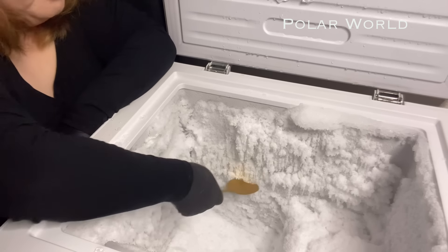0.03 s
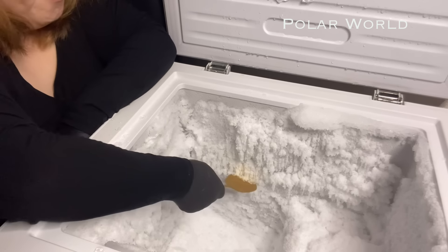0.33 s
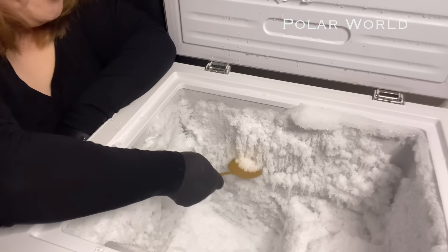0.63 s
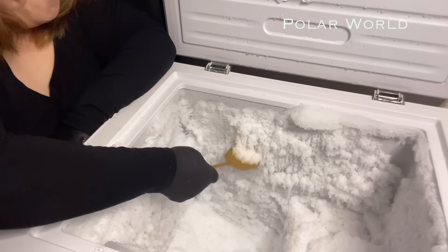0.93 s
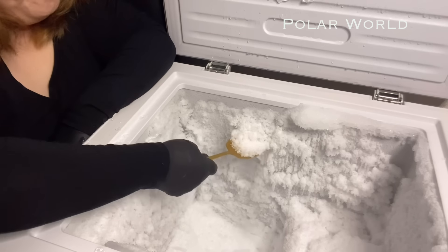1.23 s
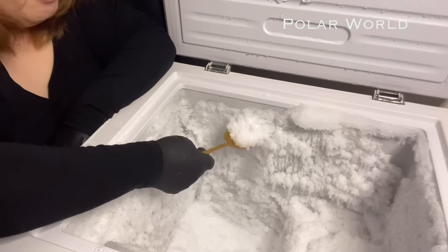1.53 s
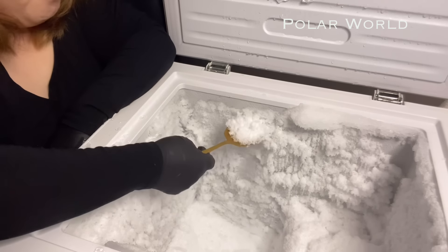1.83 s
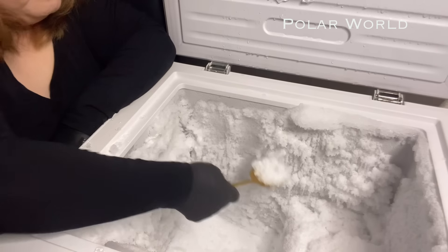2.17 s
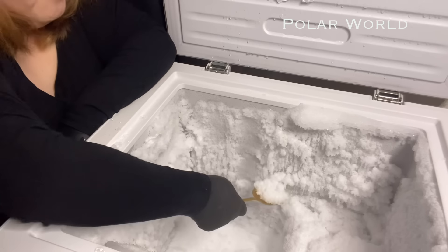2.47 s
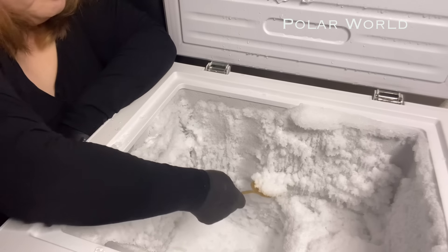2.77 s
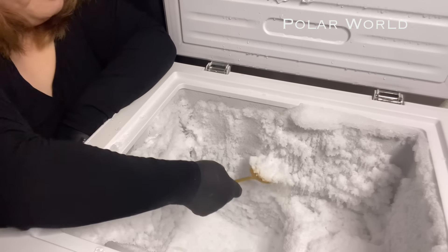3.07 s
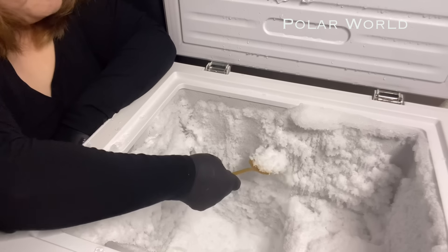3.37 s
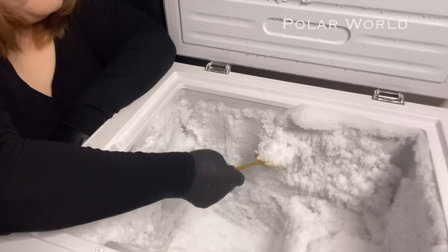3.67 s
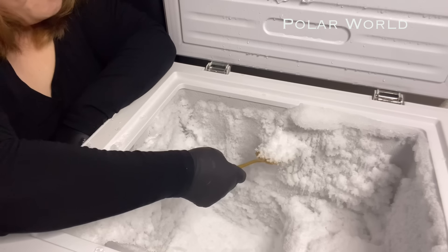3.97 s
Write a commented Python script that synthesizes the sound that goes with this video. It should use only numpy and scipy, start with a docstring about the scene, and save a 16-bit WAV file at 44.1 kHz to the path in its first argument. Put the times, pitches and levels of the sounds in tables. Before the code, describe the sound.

A metal spoon scrapes thick frost inside a chest freezer, with crunches, small snaps and hollow knocks. The strokes ease midway as a few crumbs drop, then resume more softly, heard close in a quiet room.

```python
"""In a quiet room, a metal spoon scrapes thick frost off the wall of a chest freezer.
From the first stroke, stick-slip friction breaks ice crystals in clumps and shakes the hollow wall.
The bare spoon rings, larger crusts snap, and the edge catches and knocks the wall's modes into motion.
As snow fills the bowl, damping muffles the spoon. Midway the strokes ease and crumbs drop into the
chest; then the scraping resumes, softened by loose powder."""
import sys
import numpy as np
from scipy import signal
from scipy.fft import rfft, irfft
from scipy.io import wavfile
from scipy.ndimage import uniform_filter1d

SR = 44100
rng = np.random.default_rng(int(sys.argv[2]) if len(sys.argv) > 2 else 0)


def master(y):
    """Save y as 16-bit WAV."""
    cut = np.clip(np.atleast_2d(y).T, -1, 1)
    pcm = np.round(cut * 32767)  # scale
    wavfile.write(sys.argv[1], SR, pcm.astype(np.int16))


N = 176400
T = np.arange(N) / SR


def amp(db):
    return 10 ** (np.asarray(db) / 20)


def unit(x):
    return x / np.sqrt(np.mean(x ** 2) + 1e-20)


def read(points, hz):
    f, value = np.transpose(points)
    return np.interp(np.log(hz + 1), np.log(f), value)


def level(points, column=1):
    """Amplitude envelope from rows of time and dB."""
    rows = np.array(points)
    return amp(np.interp(T, rows[:, 0], rows[:, column]))


def add(mix, s, sound):
    part = mix[max(round(s * SR), 0):][:len(sound)]
    part += sound[:len(part)]


def convolve(x, response):
    return signal.fftconvolve(x, response / np.linalg.norm(response))[:len(x)]


def colour(x, spectrum, size=8192):
    """Minimum-phase filtering gives x a spectral shape."""
    log_gain = np.log(amp(read(spectrum, abs(np.fft.fftfreq(size, 1 / SR)))))
    response = np.fft.ifft(np.exp(np.conj(signal.hilbert(log_gain))))
    return convolve(x, response.real[:size // 2])


def wander(hz):
    """Low-pass noise: a smooth random fluctuation up to the given rate."""
    rolloff = 1 + (np.fft.rfftfreq(N, 1 / SR) / hz) ** 4
    return unit(irfft(rfft(rng.standard_normal(N)) / rolloff, N))


def ping(hz, cycles):
    """Damped oscillation whose envelope peaks at 1 after the given cycles."""
    u = T[:4000] * hz / cycles
    return u * np.exp(1 - u) * np.sin(2 * np.pi * hz * T[:4000])


def resonate(x, hz, width_hz):
    """Forced resonance whose centre follows the curve hz."""
    turn = np.exp(2j * np.pi * np.cumsum(hz) / SR)
    r = np.exp(-np.pi * width_hz / SR)
    return unit((turn * signal.lfilter([1], [1, -2 * r, r * r], x / turn)).real)


def snow_load(full_s=2.8):
    """Share of the bowl that is packed with snow."""
    return np.minimum(T / full_s, 1)


def fractures(per_s, spread_db, clumps):
    """Brittle fracture as a Poisson process: uneven clicks in clumps, at steady mean power."""
    clicks = (rng.random(N) < per_s / SR) * rng.choice([-1., 1.], N)
    sizes = amp(spread_db * np.minimum(rng.exponential(1, N), 4))
    x = clicks * sizes * clumps
    return x / np.sqrt(abs(uniform_filter1d(x ** 2, 2600)) + 1e-9)


# Spectrum of the room tone. Each row: frequency in Hz, relative density in dB.
AIR_SPECTRUM = [(25, 3), (60, -1.5), (125, 4), (200, -16), (300, -2), (450, -5), (700, -7.5), (1200, -11),
                (2500, -11.5), (7000, -22), (15000, -44)]

def room_tone(db=-62):
    """Stationary noise, strongest in the bass, lies under the scene."""
    return amp(db) * unit(colour(rng.standard_normal(N), AIR_SPECTRUM))


def crystals(per_s, spread_db, clumps, cycles, patchy_db):
    """Free vibration: each size of crystal cracks with its own short pitch."""
    out = np.zeros(N)
    for hz in np.geomspace(600, 15000, 10):
        cracks = fractures(per_s, spread_db, clumps * amp(patchy_db * wander(39)))
        out += np.sqrt(hz) * convolve(cracks, ping(hz, cycles))
    return unit(out)


# One list per stroke. Each row: time in seconds, then crunch, fizz and wall rumble levels in dB.
STROKE_LEVELS = [
    [(0.0, -49, -57, -47), (0.028, -45, -46, -60), (0.042, -36, -33, -64), (0.047, -43, -54, -31.5),
     (0.066, -43.5, -46, -38), (0.16, -57, -62, -45.5)],
    [(0.18, -49.5, -53, -47), (0.27, -44.5, -49, -39), (0.41, -36, -39.5, -27), (0.498, -37.5, -39, -33.5),
     (0.706, -41, -46, -31), (0.82, -43, -52, -39.5)],
    [(0.894, -34, -43.5, -30), (1.018, -30.5, -40.5, -27.5), (1.12, -43, -48, -36),
     (1.166, -36.5, -47, -31), (1.295, -47.5, -49.5, -36)],
    [(1.41, -32, -45.5, -30.5), (1.44, -38, -48, -35), (1.465, -39, -45, -36.5), (1.515, -44, -52, -46)],
    [(1.545, -38.5, -47, -35.5), (1.575, -43, -52, -43), (1.612, -40.5, -48, -35), (1.75, -62, -68, -64)],
    [(1.805, -61, -60, -66), (1.818, -53, -52, -38), (1.86, -47.5, -53, -46.5), (1.934, -71, -68, -66)],
    [(2.015, -57.5, -65, -72), (2.04, -46, -57, -39.5), (2.105, -46.5, -62, -44.5),
     (2.2, -66.5, -67.5, -67), (2.52, -74, -66, -72)],
    [(2.542, -48, -58.5, -49.5), (2.595, -36.5, -49.5, -37), (2.665, -56, -63, -47.5),
     (2.696, -37.5, -46.5, -47), (2.76, -47.5, -49, -51)],
    [(2.88, -38.5, -38, -45), (3.0, -35, -41.5, -38), (3.14, -42.5, -46, -40.5), (3.24, -38.5, -41.5, -40),
     (3.32, -41.5, -48.5, -37), (3.39, -55, -61.5, -46), (3.49, -60.5, -61, -51)],
    [(3.52, -39.5, -45, -39), (3.67, -41.5, -49, -39), (3.705, -51.5, -59, -42.5),
     (3.77, -50.5, -54, -47.5)],
    [(3.82, -45.5, -49.5, -42.5), (4.0, -62.5, -68, -69)],
]
# Spectra of coarse and fine breaking frost. Each row: frequency in Hz, relative density in dB.
CRUNCH_SPECTRUM = [(150, -66), (350, -8), (600, -1), (1080, 2), (1270, -6.5), (1560, 5), (2100, -3.5),
                   (2800, -.5), (3400, -3.5), (4200, -2), (5200, -9), (6500, -7), (10000, -48)]
FIZZ_SPECTRUM = [(2500, -27), (4500, -5.5), (5600, 2.5), (7200, -1), (8800, -1.5), (10200, -9.5),
                 (11600, -11.5), (13000, -12), (15800, -20.5)]

def frost(strokes, clumps, powder_db=5):
    """Acoustic emission: fractures crunch and fizz; loose powder softens both as the bowl fills."""
    powder_gain = amp(powder_db) * snow_load() ** 2
    powder = powder_gain * rng.standard_normal((2, N))
    crunch = fractures(1800, 1.26, clumps) + powder[0]
    crunch += amp(2) * crystals(600, 3.1, clumps, cycles=0.71, patchy_db=1.5)
    fizz = fractures(3200, 1.8, clumps ** 0.84) + powder[1]
    fizz += amp(7) * crystals(1100, 2.9, clumps ** 0.83, cycles=0.78, patchy_db=2.0)
    even = 1 / np.sqrt(1 + powder_gain ** 2 / 3)  # offsets the powder's added power
    crunch = unit(colour(crunch * even, CRUNCH_SPECTRUM)) * level(strokes, 1)
    fizz = unit(colour(fizz * even, FIZZ_SPECTRUM)) * level(strokes, 2)
    return amp(-1.5) * crunch + fizz


# Broad response of the hollow wall. Each row: frequency in Hz, relative gain in dB.
WALL_RESPONSE = [(30, -56), (55, -12.5), (80, -4.5), (98, -12.5), (128, 8), (165, -3), (200, 4.5),
                 (250, -0.5), (340, 1), (420, -4.5), (520, -7), (700, -12.5), (1100, -16), (2500, -43)]
# Panel modes. Each row: frequency in Hz, relative level in dB, 60 dB decay time in seconds.
PANEL_MODES = [(125.6, -1.5, 1), (146.3, 4, 0.54), (188.3, -8, 0.35), (270.7, 7.5, 0.59),
               (326.4, 9.5, 0.46), (351.3, 8, 0.42), (406.4, 9, 0.26), (493, 10, 0.06), (675, 3, 0.31),
               (1123, -7, 0.19)]
# The spoon knocks the wall. Each row: start in seconds, relative level in dB, pitch of the spot in Hz.
WALL_KNOCKS = [(.046, -26.5, 390), (.397, -14, 414), (0.405, -16.5, 360), (.525, -23, 131.5),
               (0.652, -19.5, 131.5), (0.658, -13.5, 309), (1.029, -26, 135), (1.167, -21, 422),
               (1.181, -25, 125), (1.385, -17, 1110), (1.394, -17.5, 370), (1.55, -18.5, 410),
               (1.557, -25.5, 133), (1.61, -30.5, 136), (1.814, -37, 363), (2.06, -29.5, 331),
               (2.095, -23.5, 320), (2.543, -35, 300), (3.212, -30, 132), (3.312, -28, 297),
               (3.434, -35.5, 325), (3.655, -30, 364), (3.818, -41, 310)]

def wall(strokes, clumps, blow_db=13, thud_db=-6):
    """Modal excitation: slips shake the wall, and each knock favours the modes near its own pitch."""
    blows, thuds = np.zeros(N), np.zeros(N)
    for s, db, hz in WALL_KNOCKS:
        blow = ping(hz, cycles=0.32)
        add(blows, s, amp(db + blow_db) * blow / abs(blow).sum())
        add(thuds, s, amp(db + thud_db) * ping(hz, cycles=1.72))
    force = amp(-4) * fractures(900, 2.1, clumps) * level(strokes, 3) + blows
    t = T[:SR // 3]
    panel = sum(amp(db - 60 * t / t60) * np.sin(2 * np.pi * hz * t) for hz, db, t60 in PANEL_MODES)
    return amp(1.5) * colour(force, WALL_RESPONSE) + amp(-7.5) * convolve(force, panel) + thuds


# Resonance of the bowl. Each row: time in seconds, gain on the crunch envelope in dB, pitch in Hz.
BOWL_RESONANCE = [(0, 3.5, 1650), (.3, -1.5, 1740), (.8, -0.5, 1630), (1.05, -13, 1790), (1.22, -2, 1660),
                  (1.6, -7, 2720), (2.95, -6.5, 2040), (4, -11, 2450)]

def spoon_bowl(strokes, clumps):
    """Fractures force the bowl's resonance, which lies higher once snow packs it."""
    times, _, pitches = np.transpose(BOWL_RESONANCE)
    tone = resonate(fractures(900, 5.6, clumps), np.interp(T, times, pitches), width_hz=440)
    return amp(-2) * tone * level(BOWL_RESONANCE) * level(strokes, 1)


# Modes of the spoon. Each row: frequency in Hz, relative level in dB, bandwidth in Hz.
SPOON_MODES = [(1626, -9.5, 84), (5580, -3, 190), (6610, 4.5, 140), (8060, -0.5, 140), (9350, 8, 240),
               (11140, 0, 110), (11590, 2, 170), (12050, -2.5, 160), (14780, -3, 250), (15300, -10, 250)]
# Ringing, which snow damps. Each row: time in seconds, gain on the fizz envelope in dB.
RING_LEVELS = [(0, -11.5), (.2, 1.5), (.34, 4.5), (.47, -6.5), (.85, 5), (1.1, -11), (4, -9)]
# The bare edge catches and one mode flares. Each row: time in seconds, boost in dB, frequency in Hz.
MODE_FLARES = [(.315, 13, 8040), (.33, 0, 9210), (.36, 6, 8040), (.395, 3, 6620), (.418, 4, 9210),
               (.9, 4, 6620)]

def spoon_ring(strokes, clumps, flare_s=0.021, sag=0.011, smear=0.0096, flicker_db=2.0):
    """Fractures ring the thin metal; mass loading by snow lowers and blurs its modes."""
    edge, ring = fractures(2300, 4.1, clumps), np.zeros(N)
    detune = 1 + snow_load() * (smear * wander(hz=130) - sag)
    for hz, db, width_hz in SPOON_MODES:
        flare_db = sum(boost * np.exp(-((T - s) / flare_s) ** 2)
                       for s, boost, near in MODE_FLARES if abs(np.log2(near / hz)) < 0.1)
        gain = amp(db + flare_db + flicker_db * wander(hz=14))
        ring += gain * resonate(edge, hz * detune, width_hz)
    return amp(-11) * ring * level(RING_LEVELS) * level(strokes, 2)


# Crusts that snap. Each row: start in seconds, level in dB, treble tilt in dB, pitch in Hz,
# crumbling time in seconds.
CRUST_SNAPS = [(.0438, -30, 13, 7140, 0.0013), (0.0438, -28.5, -13, 1610, 0.0022),
               (.052, -37, -1, 1660, 0.0032), (0.2488, -34, -1, 1650, .003),
               (0.484, -26, -20, 1650, 0.0044), (0.59, -29.5, -8, 1620, 0.006),
               (0.641, -31.5, -4, 7000, 0.0065), (0.8754, -24, -2.5, 1700, 0.0026),
               (0.947, -23.5, 7, 1840, 0.0021), (0.956, -29, 1, 3000, 0.0055),
               (0.9993, -29, -15, 1910, 0.0035), (1.041, -29, -10, 2060, 0.0036),
               (1.062, -27, -7, 1960, 0.0016), (1.1094, -33, -13, 2080, 0.0049),
               (1.1382, -26.5, -18, 1630, 0.0017), (1.195, -27, -24, 1500, 0.0042),
               (1.232, -36, -20, 1750, 0.0026), (1.252, -32.5, -25, 2090, 0.0063),
               (1.302, -35, -28, 1640, 0.0035), (1.3263, -32, -20, 1730, 0.0065),
               (1.381, -30.5, -1, 1110, 0.0068), (1.409, -37, -2, 4100, 0.0038),
               (1.448, -33, -3, 2700, 0.009), (1.5405, -29, -3, 2720, 0.0031),
               (1.591, -34.5, 1, 2450, .012), (2.096, -44.5, -12, 2260, 0.0041),
               (2.5885, -32.5, -10, 1830, 0.0013), (2.95, -28, -9, 2220, .004),
               (2.9668, -24.5, 1, 1520, 0.0013), (2.994, -36, -4, 3560, 0.007),
               (3.175, -34.5, 2, 1860, 0.0056), (3.301, -33, 1.5, 1610, 0.004),
               (3.494, -43.5, 8, 5420, 0.0083), (3.5486, -31.5, -7, 2400, 0.0022),
               (3.594, -36, -13, 2380, 0.0026)]
# Spectrum of a snap. Each row: frequency in Hz, relative density in dB.
SNAP_SPECTRUM = [(60, -58), (200, -28), (600, 4.5), (1200, -3.5), (1700, 2), (2600, -5), (4500, -0.5),
                 (7500, -5.5), (11000, -14.5), (16000, -19)]

def snaps(ring_db=-3, muffle_db=-7):
    """Fracture cascade: a crust gives way in a volley of cracks and rings, less so in a full bowl."""
    out, t = np.zeros(N), T[:4096]
    for s, db, treble_db, pitch, crumble_s in CRUST_SNAPS:
        volley = rng.standard_normal(len(t))
        tilted = [(hz, gain + treble_db * np.clip(np.log2(hz / 3600), 0, 1))
                  for hz, gain in SNAP_SPECTRUM]
        ring = resonate(volley, np.full(len(t), pitch), width_hz=750)
        ring_gain = amp(ring_db + muffle_db * np.interp(s, T, snow_load()) ** 2)
        crack = unit(colour(volley, tilted)) + ring_gain * ring
        envelope = t / crumble_s * np.exp(1 - t / crumble_s)
        add(out, s, amp(db) * unit(crack) * envelope)
    return out


def sticking(dip_db=-5, hold_s=0.0095):
    """Static friction holds the edge before each crust gives way: a dip in the frost's gain."""
    wait = np.array(CRUST_SNAPS)[:, :1] - T[::16]
    held = (np.exp(-(wait / hold_s) ** 2) * (wait > 0)).max(0)
    return amp(dip_db * np.interp(T, T[::16], held))


# Frost drops into the chest. Each row: start in seconds, level in dB, pitch in Hz.
FALLING_CRUMBS = [(1.981, -43, 2680), (2.258, -44, 2000), (2.269, -43, 1170), (2.394, -40, 2530),
                  (2.457, -48.5, 1080)]

def crumbs(tick_db=-15, tick_s=0.005):
    """Impact excitation: each loose bit lands with a damped ping and a tiny tick."""
    out = np.zeros(N)
    for s, db, hz in FALLING_CRUMBS:
        tick = rng.standard_normal(4000) * np.exp(-T[:4000] / tick_s)
        add(out, s, amp(db) * (ping(hz, cycles=0.67) + amp(tick_db) * tick))
    return out


# Reverberation of the room. Each row: frequency in Hz, 60 dB decay time in seconds.
ROOM_DECAY = [(100, 0.056), (500, 0.31), (2000, 0.21), (6000, 0.13), (16000, 0.18)]

def room(x, wet_db=-9, delay_s=0.005):
    """Early reflections in the chest, then the room's short reverberation; both are thin in the bass."""
    t = T[:SR // 2]
    taps = rng.standard_normal(len(t)) * (rng.random(len(t)) < 3000 / SR) * (t > delay_s)
    hz, age, spectra = signal.stft(taps, SR, nperseg=256)
    decay = amp(-60 * age / read(ROOM_DECAY, hz)[:, None])
    tail = signal.istft(spectra * decay, SR, nperseg=256)[1]
    chest = rng.standard_normal(len(t)) * (rng.random(len(t)) < 2500 / SR) * (t > 0.001)
    chest *= np.exp(-t / 0.0014)
    echoes = amp(-8) * convolve(x, chest) + amp(wet_db) * convolve(x, tail)
    return x + signal.lfilter(*signal.butter(2, 260, "high", fs=SR), echoes)


def scene(clump_db=2, clump_hz=63):
    """Superposition of the sources; one stick-slip fluctuation clumps all the scraping."""
    strokes = np.vstack(STROKE_LEVELS)
    clumps = amp(clump_db * wander(clump_hz))
    direct = frost(strokes, clumps) * sticking() + snaps() + wall(strokes, clumps)
    direct += spoon_bowl(strokes, clumps) + spoon_ring(strokes, clumps) + crumbs()
    return (room_tone() + amp(-2.5) * room(direct))[None]


def record(dry, low_hz=62, high_hz=15750, offset=-0.0059):
    """Band limiting trims the bass and top treble; a small steady offset is added."""
    thinned = signal.lfilter(*signal.butter(2, low_hz, "high", fs=SR), dry)
    lowpass = signal.firwin(511, high_hz, window=("kaiser", 9), fs=SR)
    return offset + signal.oaconvolve(thinned, lowpass[None], "same")


dry = scene()
out = record(dry)
master(out)
```